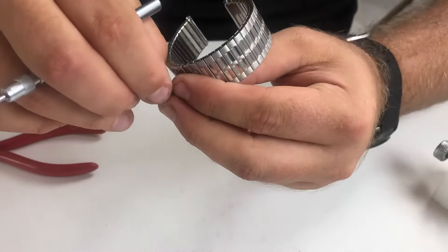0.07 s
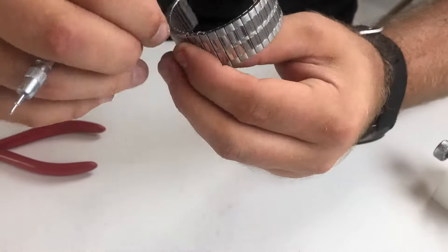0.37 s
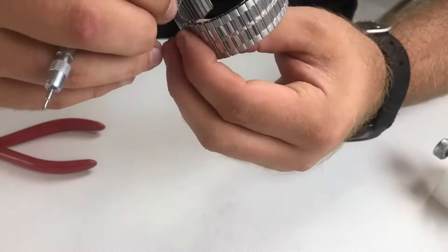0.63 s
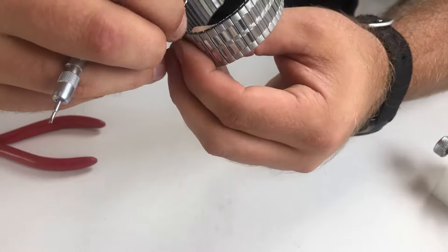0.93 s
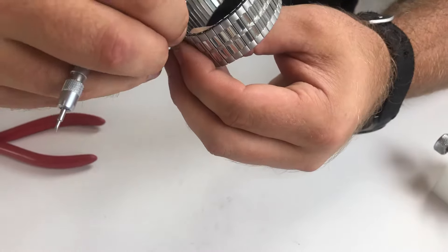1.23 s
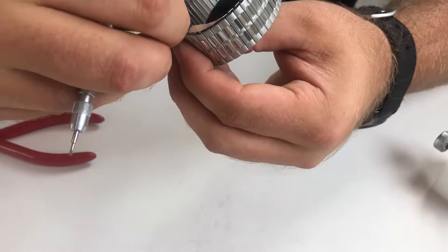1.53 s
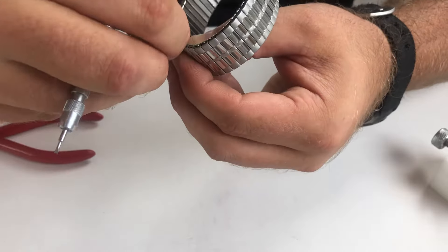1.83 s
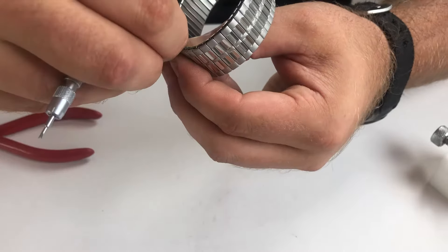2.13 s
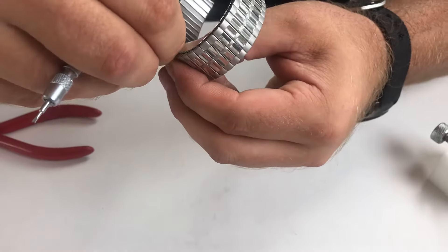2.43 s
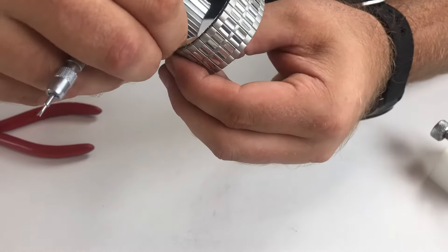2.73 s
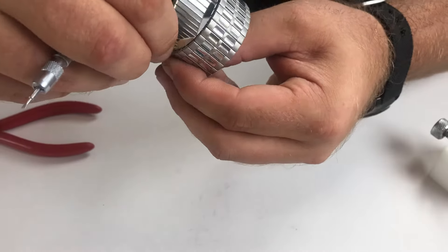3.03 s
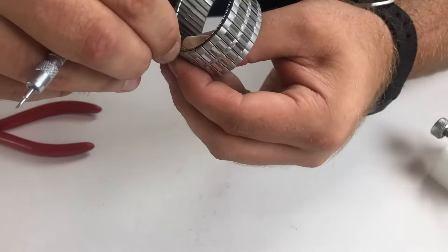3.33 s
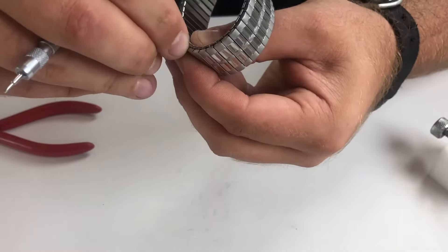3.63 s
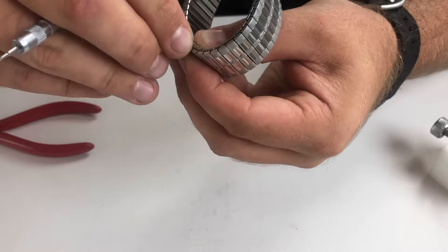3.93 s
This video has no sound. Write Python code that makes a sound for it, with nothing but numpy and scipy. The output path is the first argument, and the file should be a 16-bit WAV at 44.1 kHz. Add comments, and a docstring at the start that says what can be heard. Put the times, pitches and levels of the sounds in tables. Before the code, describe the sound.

A steel watch band gives faint, sharp ticks close up, over a steady low fan hum and hiss. A soft rushing fades after the first second. One tick comes at 1 second, then a tiny tool squeak at 1.4. Near 2 seconds a soft knock and brief rub lead into two ticks, the second the clearest. Single ticks follow around 2.6, very faintly 3.3, and 3.9 seconds.

```python
"""A steel watch band is turned in the fingers and worked with a small tool, heard close up.
Its links snap against each other with short, bright ticks. The tool slips once in a tiny squeak,
and the band knocks softly against the fingers, with a faint rub and a thin chirp.
Behind it, a room's fans rumble, hum, hiss and whine; a soft rushing fades after the first second."""
import sys
import numpy as np
from scipy import signal
from scipy.fft import rfft, irfft
from scipy.io import wavfile

SR = 44100
rng = np.random.default_rng(int(sys.argv[2]) if len(sys.argv) > 2 else 0)


def store_pcm(level_fs):
    """Save levels as 16-bit WAV."""
    pcm = np.round(np.clip(level_fs, -1, 1) * 32767).astype(np.int16)
    wavfile.write(sys.argv[1], SR, np.atleast_2d(pcm).T)


N = 176400

# Ticks of the links (time [s], level [dB], centre pitch [Hz], spread [octaves], decay time [s])
LINK_TICKS = [(1.025, -56.5, 12500, 0.49, 0.0025), (2.004, -56, 7500, 0.66, 0.0026),
              (2.0882, -40.5, 13500, 0.82, 0.001), (2.6270, -47.5, 10500, 1.1, 0.002),
              (3.267, -65, 11000, 1, .005), (3.8882, -54.5, 9600, .9, 0.0022)]
# Notes a link rings with (pitch [Hz], relative level [dB], time to fade by 60 dB [s])
LINK_NOTES = [(6440, 6, 0.012), (7170, 5.5, 0.022), (8100, 4, 0.019), (9700, -23, 0.0074),
              (12600, 3, 0.0046), (14500, 7.5, 0.0083), (15350, -1, .01)]
# The tool slipping on steel (time [s], level [dB])
TOOL_SQUEAKS = [(1.379, -41.5)]
# Notes the tool and band ring with (pitch [Hz], relative level [dB], time to fade by 60 dB [s])
SQUEAK_NOTES = [(1050, -6.5, 0.006), (2220, 0, 0.008), (2360, 4, .011), (3000, -6, 0.009),
                (4220, -5, 0.016), (4700, -3, .004), (5080, 7, 0.0095), (5450, -1, .006)]
# Strong pitches in the tool's scrape (pitch [Hz], width [Hz], relative level [dB])
SCRAPE_BANDS = [(5070, 900, 8.5), (9340, 1300, -4), (10700, 600, -2), (14800, 900, 0)]
# The band knocking against the fingers (time [s], level [dB])
BAND_KNOCKS = [(1.9362, -44.5)]
# Notes of the knock (pitch [Hz], relative level [dB], time to fade by 60 dB [s])
KNOCK_NOTES = [(1430, -0.5, 0.017), (1780, -1.5, 0.013), (2260, -1.5, 0.017)]
# Strong pitches in the rub of the links (pitch [Hz], width [Hz], level [dB])
RUB_BANDS = [(1630, 180, -65.5), (2300, 1400, -71)]
# A link's thin chirp (time [s], length [s], starting pitch [Hz], rise [Hz], level [dB])
LINK_CHIRPS = [(1.9463, .009, 12000, 800, -56.5)]
# Fan and motor tones (pitch [Hz], level [dB], unsteadiness [0-1])
HUM_TONES = [(96.75, -59.5, .4), (105.6, -54.5, 0.36), (194.8, -57, 0.79), (199.5, -50, 0.42),
             (211.2, -52, 0.31), (361.4, -69, 0.2), (400.7, -67.5, 0.3), (409, -69.5, 0.5),
             (661, -76, 0.99)]
# Slow wandering of the hum's clearest tone (time [s], level [dB])
DRONE_LEVELS = [(0, -50.5), (.28, -42), (.5, -51.5), (.95, -50), (1.3, -53), (1.62, -46), (1.88, -51.5),
                (2.1, -45.5), (2.3, -49.5), (3.3, -49), (3.5, -53), (4, -49.5)]
# Tone colour of the fans' rumble (pitch [Hz], relative level [dB])
RUMBLE_COLOUR = [(15, -38), (30, -23), (42, -17.5), (52, -12.5), (80, -8.5), (105, -7), (128, -12),
                 (160, -3), (182, -5), (220, -10.5), (255, -16), (295, -11.5), (335, -13.5), (385, -20),
                 (430, -22.5), (490, -28.5), (600, -30), (670, -25), (760, -34), (950, -36.5), (1250, -45),
                 (2500, -77)]
# Tone colour of the air hiss (pitch [Hz], relative level [dB])
HISS_COLOUR = [(300, -16.5), (1200, -3), (1700, 0), (2300, 3), (3300, -1), (4700, -6), (5700, -7.5),
               (6800, -11.5), (9000, -17), (11500, -17.5), (12400, -19), (13800, -18), (15200, -19),
               (16500, -12.5)]
# Pitches that stand out of the hiss (pitch [Hz], width [Hz], boost [dB])
HISS_BOOSTS = [(2243, 46, 7.5), (2603, 54, 4), (3080, 80, 6.5), (3610, 75, 6), (4364, 194, 8),
               (4930, 107, 7), (5650, 350, 4.5), (6340, 270, 4), (7400, 230, 1.5), (8400, 400, 1.5),
               (10350, 120, 2.5)]
# The fans' faint, high whine (pitch [Hz], width [Hz], base level [dB])
WHINE_BANDS = [(1863, 14, -86), (1898, 12, -83.5), (1978, 11, -80), (2350, 40, -90.5), (2557, 22, -74.5),
               (2750, 100, -79), (2803, 15, -79.5), (3050, 84, -85), (3104, 15, -81)]
# How the whine comes up (time [s], change from base level [dB])
WHINE_CHANGES = [(0, -15), (.7, -6), (1.15, 1.5), (4, 0.5)]
# The fans' faint, steady whistles (pitch [Hz], width [Hz], level [dB])
WHISTLE_BANDS = [(825.5, 23, -73), (1398, 43, -76.5), (1714, 22, -84.5)]
# Rise and fall of the soft rushing (time [s], level [dB])
RUSH_LEVELS = [(0, -70), (.55, -66), (1.05, -66.5), (1.3, -74), (2.2, -76.5), (4, -78)]


def tick(level_db, centre_hz, spread, decay_s, size=2048):
    """A link snaps against its neighbour: a burst of noise and a ring cut short by the fingers."""
    rise_s, crack_s, low_cut_hz = .0001, .00014, 4200
    t, hz = np.arange(size) / SR, np.fft.rfftfreq(size, 1 / SR)
    envelope = (1 - np.exp(-t / rise_s)) * (np.exp(-t / decay_s) + 1.6 * np.exp(-t / crack_s))
    snap = unit(rng.standard_normal(size) * envelope) + amp(-1) * unit(ring(LINK_NOTES))
    # Filter at double length so the start does not wrap round to the end.
    colour = np.interp(np.arange(size + 1) / 2, np.arange(len(hz)), hump(hz, centre_hz, spread))
    snap = irfft(rfft(snap, 2 * size) * colour)[:size]
    snap = signal.sosfilt(signal.butter(4, low_cut_hz, "high", fs=SR, output="sos"), snap)
    return amp(level_db) * unit(snap) * np.sqrt(np.mean(envelope ** 2))


def squeak(level_db, size=2048):
    """The tool sticks and slips in quickening, ever harder jerks that ring it and the band."""
    length_s, slip_hz, top_hz = .007, 1055, 5830
    growth_db, speed_up, jitter = 3, .14, .035
    scrape_s, scrape_db = .0115, -53.5
    t = np.arange(size) / SR
    slips = np.zeros(size)
    at = 0
    for progress in np.linspace(-.5, .5, int(length_s * slip_hz)):
        add(slips, at, amp([growth_db * progress]))
        at += (1 + jitter * rng.standard_normal()) / (slip_hz * (1 + speed_up * progress))
    slips = signal.sosfilt(signal.butter(4, top_hz, fs=SR, output="sos"), slips)
    ringing = unit(signal.fftconvolve(slips, ring(SQUEAK_NOTES))[:size]) * np.sqrt(length_s * SR / size)
    # A fine scrape outlasts the jerks.
    scrape = noise(lambda f: sum(amp(db) * peak(f, hz, width) for hz, width, db in SCRAPE_BANDS), size)
    return amp(level_db) * ringing + amp(scrape_db) * scrape * np.exp(-(t / scrape_s) ** 6)


def knock(level_db):
    """The band bumps softly against the fingers and rings for a moment."""
    return amp(level_db) * ring(KNOCK_NOTES)


def rub(length_s=.16, catches_per_s=70, crackle_db=-70.5, size=16384):
    """The links rub faintly, and tiny catches add a fine crackle."""
    arch = np.sin(np.pi * np.minimum(np.arange(size) / SR / length_s, 1))
    catches = rng.standard_normal(size) * (rng.random(size) < catches_per_s / SR)
    colour = peak(np.fft.rfftfreq(size, 1 / SR), hz=4700, width=2200)
    crackle = unit(irfft(rfft(catches) * colour, size))
    return np.sqrt(abs(arch)) * (bands(RUB_BANDS, size) + amp(crackle_db) * crackle)


def chirp(length_s, hz, rise_hz, level_db):
    """A link gives a very short, high, rising squeal."""
    progress = np.arange(0, length_s, 1 / SR) / length_s
    phase = 2 * np.pi * np.cumsum(hz + rise_hz * progress) / SR
    return amp(level_db) * np.sin(np.pi * progress) ** 2 * np.sin(phase)


def room_echo(sound, level_db=-15, fade_s=.082, size=16384):
    """Sound bounces off the table and walls, leaving a weak, short tail."""
    t = np.arange(size) / SR
    tail = noise(lambda f: 1 / np.hypot(1, f / 7000), size)  # softer above 7000 Hz
    tail = tail * amp(-60 * t / fade_s) * (t > .003)  # the first bounce takes 3 ms
    return amp(level_db) * signal.fftconvolve(sound, tail / np.linalg.norm(tail))[:N]


def fan_hum():
    """Fans and motors hum in low tones; the clearest one slowly grows and shrinks."""
    hum = sum(amp(db) * fan_tone(hz, unsteady) for hz, db, unsteady in HUM_TONES)
    return hum + gain_over_time(DRONE_LEVELS) * fan_tone(hz=316.8, unsteady=.15)


def fan_tone(hz, unsteady, waver_hz=4.8):
    """One fan tone that wavers at random in level and phase (its place in the cycle)."""
    a, b = (noise(lambda f: 1 / (1 + (f / waver_hz) ** 2)) for _ in range(2))
    waver = np.sqrt(1 - unsteady ** 2) + unsteady * (a + 1j * b) / np.sqrt(2)
    steady = np.exp(2j * np.pi * (hz * np.arange(N) / SR + rng.random()))
    return unit((waver * steady).real)


def fan_rumble(level_db=-43.5, swell_at_s=.34, swell_width_s=.1, swell_db=1.5):
    """The fans make a low rumble that swells slightly, once."""
    swell = np.exp(-((np.arange(N) / SR - swell_at_s) / swell_width_s) ** 2)
    return amp(level_db + swell_db * swell) * noise(lambda f: amp(level_at(RUMBLE_COLOUR, f)))


def air_hiss(level_db=-61.5):
    """Air from the fans hisses steadily, with some pitches standing out."""
    def colour(f):
        boost_db = sum(db * peak(f, hz, width) for hz, width, db in HISS_BOOSTS)
        return amp(level_at(HISS_COLOUR, f) + boost_db)
    return amp(level_db) * noise(colour)


def fan_whine():
    """The fans' faint whine comes up over the first second or so, beside steady whistles."""
    return gain_over_time(WHINE_CHANGES) * bands(WHINE_BANDS) + bands(WHISTLE_BANDS)


def rush():
    """A soft, mid-pitched rushing that fades after the first second."""
    return gain_over_time(RUSH_LEVELS) * noise(lambda f: hump(f, hz=1000, octaves=.76))


def amp(db):
    """Turns decibels into a number to multiply by."""
    return 10 ** (np.asarray(db) / 20)


def unit(x):
    """Scales a sound to an average power of 1."""
    return x / np.sqrt(np.mean(abs(x) ** 2) + 1e-30)


def level_at(points, hz):
    """Looks up a tone colour's level in dB at any pitch."""
    pitches, db = np.transpose(points)
    return np.interp(np.log(hz + 1), np.log(pitches), db)


def gain_over_time(points):
    """Joins (time [s], level [dB]) points into a volume curve."""
    return amp(np.interp(np.arange(N) / SR, *np.transpose(points)))


def peak(f, hz, width):
    """A bell-shaped curve around one pitch, with its width in Hz."""
    return 1 / (1 + (2 * (f - hz) / width) ** 2)


def hump(f, hz, octaves):
    """A broad hill around one pitch, with its spread in octaves."""
    return np.exp(-.5 * (np.log2((f + 1) / hz) / octaves) ** 2)


def noise(shape, size=N):
    """Noise of power 1; shape(hz) sets how strong each pitch is."""
    hz = np.fft.rfftfreq(size, 1 / SR)
    return unit(irfft(rfft(rng.standard_normal(size)) * shape(hz), size))


def bands(rows, size=N):
    """Noise gathered around several pitches, each at its own level."""
    return sum(amp(db) * noise(lambda f: peak(f, hz, width), size) for hz, width, db in rows)


def ring(notes, size=2048):
    """The fading notes of a struck part."""
    t = np.arange(size) / SR
    return sum(amp(db - 60 * t / fade_s) * np.sin(2 * np.pi * hz * t) for hz, db, fade_s in notes)


def add(mix, at, sound):
    """Mixes a sound in, starting at a time in seconds."""
    part = mix[round(at * SR):][:len(sound)]
    part += sound[:len(part)]


def scene():
    """The watch band's small noises in the humming room."""
    band = np.zeros(N)
    for at, *settings in LINK_TICKS:
        add(band, at, tick(*settings))
    for at, db in TOOL_SQUEAKS:
        add(band, at, squeak(db))
    for at, db in BAND_KNOCKS:
        add(band, at, knock(db))
        add(band, at, rub())
    for at, *settings in LINK_CHIRPS:
        add(band, at, chirp(*settings))
    echo = room_echo(band)
    fans = fan_hum() + fan_rumble() + air_hiss() + fan_whine()
    return (band + echo + fans + rush())[None]


def record(dry, cutoff_hz=15900):
    """Cuts away the very highest treble."""
    low_pass = signal.firwin(511, cutoff_hz, window=("kaiser", 9), fs=SR)
    return signal.oaconvolve(dry, low_pass[None], "same")


dry = scene()
out = record(dry)
store_pcm(out)
```